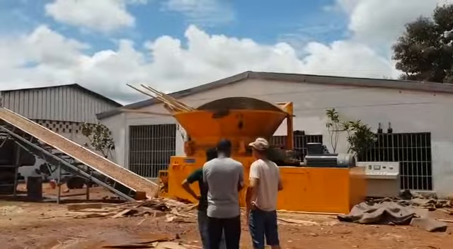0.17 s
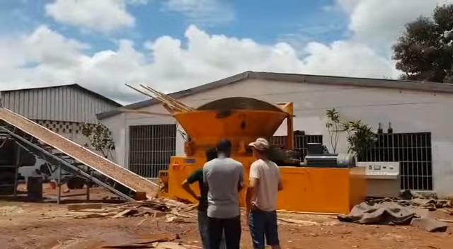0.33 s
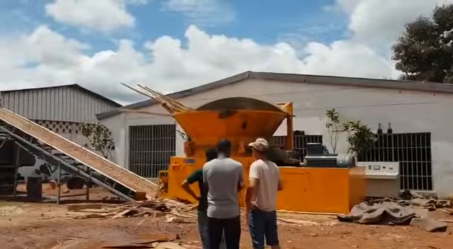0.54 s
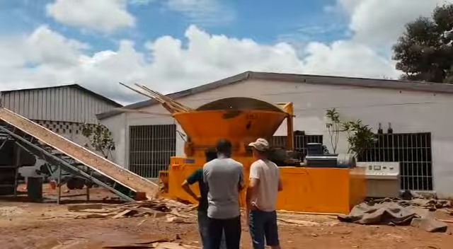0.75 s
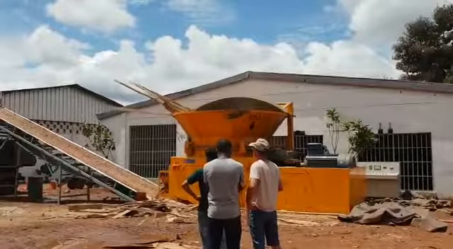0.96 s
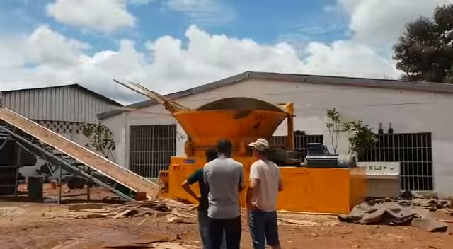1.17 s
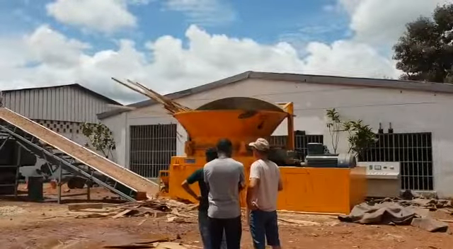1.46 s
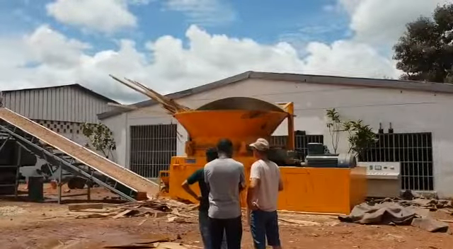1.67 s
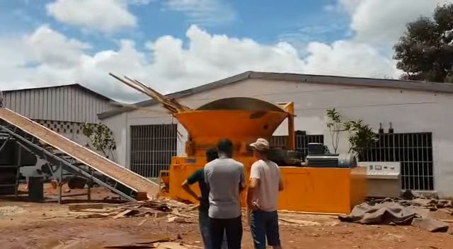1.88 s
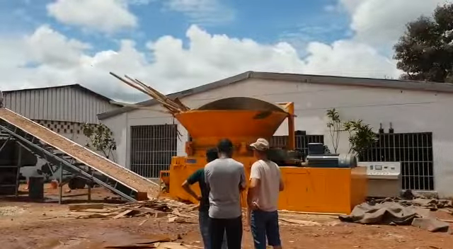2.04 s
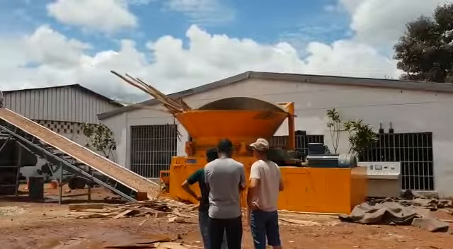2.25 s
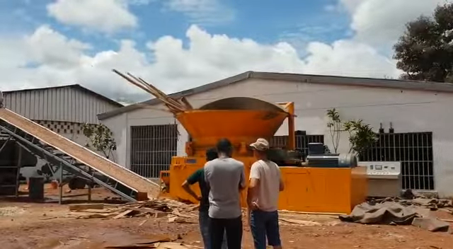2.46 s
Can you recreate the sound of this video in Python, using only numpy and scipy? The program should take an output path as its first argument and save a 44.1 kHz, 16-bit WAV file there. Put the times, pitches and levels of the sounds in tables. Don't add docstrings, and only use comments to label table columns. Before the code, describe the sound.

A large wood shredder drones and grinds outdoors, chips rattling. Knocks build to a loud ringing crack, then it eases to a steadier hum before low thuds return; small camera microphone at some distance, with echoes off buildings.

```python
import sys
import numpy as np
from scipy import signal
from scipy.fft import rfft, irfft, next_fast_len
from scipy.io import wavfile
from scipy.ndimage import uniform_filter1d, minimum_filter1d

SR = 44100
rng = np.random.default_rng(int(sys.argv[2]) if len(sys.argv) > 2 else 0)


def amp(db):
    return 10 ** (np.asarray(db, float) / 20)


def write(x):
    x = np.atleast_2d(x).T
    wavfile.write(sys.argv[1], SR, np.round(np.clip(x, -1, 1) * 32767).astype(np.int16))


N = 115101
RISE_S = .0007
CRACK_HZ = 2050


def evened(x):
    return x / np.sqrt(np.mean(x ** 2) + 1e-20)


def smooth(x, size):
    return uniform_filter1d(uniform_filter1d(x, size), size)


def read(points, hz):
    f, value = np.transpose(points)
    return np.interp(np.log(hz + 1), np.log(f + 1), value)


def colour(x, gain):
    size = next_fast_len(x.shape[-1] + 2048)
    spectrum = rfft(x, size) * gain(np.fft.rfftfreq(size, 1 / SR))
    return irfft(spectrum, size)[..., :x.shape[-1]]


def resonate(x, hz, width_hz):
    turn = np.exp(2j * np.pi * hz * np.arange(x.shape[-1]) / SR)
    r = np.exp(-np.pi * width_hz / SR)
    return 2 * (turn * signal.lfilter([1 - r], [1, -r], x / turn)).real


# start_s, hammer_load_db, wood_feed_db, frame_hum_db
WORK = [(0, -21, -22, -22.5), (0.202, -25, -22.5, -23.5), (0.401, -23.5, -21, -21.5),
        (0.549, -26, -17, -21.5), (0.612, -23.5, -17, -23.5), (.648, -26.5, -20, -22),
        (.668, -26, -18, -23), (0.802, -31.5, -20, -23.5), (.95, -23.5, -25, -23),
        (1.151, -25.5, -28.5, -24.5), (1.35, -25, -31, -24.5), (1.6, -21.5, -31, -24),
        (1.848, -22.5, -29, -23.5), (2.05, -19.5, -26, -22.5), (2.199, -17.5, -24.5, -22),
        (2.401, -13.5, -22.5, -22.5), (2.61, -16.5, -24.5, -21.5)]
LOAD, FEED, HUM = 1, 2, 3


def control(column):
    rows = np.array(WORK)
    v = np.interp(np.arange(N) / SR, rows[:, 0], rows[:, column])
    return v - v.mean()


# pitch_hz, side_minus_mid_db
APART = [(60, -18), (100, -9.5), (180, -12.5), (300, -15), (520, -13), (890, -2), (1530, 1.5), (2630, 1.5),
         (4520, 1.5), (7760, -16.5)]


def pair(a, b):
    lag_s = .00004
    side = colour(b, lambda hz: amp(read(APART, hz) - 4.5))
    late = lambda s: colour(a, lambda hz: np.exp(-1j * np.pi * hz * s))
    return np.array([late(lag_s) + side, late(-lag_s) - side])


def noise(shape, patchy_db):
    frames, hz = N // 256 + 5, np.fft.rfftfreq(1024, 1 / SR)
    a, b, c, d, patches = rng.standard_normal((frames, 513, 5)).T
    patches = evened(uniform_filter1d(uniform_filter1d(patches, 10, 0), 10, 1))
    level_db = read(shape, hz)[:, None] + patchy_db * patches
    z = np.array([a + 1j * b, c + 1j * d]) * amp(level_db)
    return pair(*evened(signal.istft(z, nperseg=1024, noverlap=768)[1][:, :N]))


def yard(x):
    t60_s = .45
    taps = np.zeros((2, SR // 2))
    at = np.arange(200, SR // 2 - 22, 22) + rng.integers(0, 22, (2, (SR // 2 - 201) // 22))
    np.put_along_axis(taps, at, rng.choice([-1., 1.], at.shape), 1)
    hz, t, z = signal.stft(taps, SR, nperseg=256)
    fade_db = -60 * t / t60_s * (1 + hz / 6000)[:, None]
    tail = signal.istft(z * amp(fade_db), SR, nperseg=256)[1]
    tail = tail / np.linalg.norm(tail[0])
    return pair(*signal.fftconvolve(x[None], tail, axes=1)[:, :N])


# pitch_hz, level_db (per Hz)
RUMBLE = [(12, -47), (20, -13), (43, -4.5), (70, 4), (240, 6), (357, -16.5), (595, -2.5), (767, -24.5),
          (900, -12), (1170, -19.5), (1980, -120)]
# pitch_hz, level_db (per Hz)
GRIND = [(180, -39.5), (300, -9), (373, -8.5), (585, -9.5), (779, -7.5), (1130, -10), (3540, -18),
         (7290, -30), (7800, -23.5), (10100, -84), (17200, -120)]


def machine():
    rumble = amp(-24.5 + 0.27 * control(LOAD)) * noise(RUMBLE, patchy_db=-0.1)
    whirr = amp(-30.5) * noise(GRIND, patchy_db=-2.5)
    grind = amp(-24 + 0.78 * control(FEED)) * noise(GRIND, patchy_db=2.0)
    return rumble + whirr + grind


def chips():
    chips_per_s, level_db, spread_db = 2500, -27.5, 2
    size = amp(spread_db * np.minimum(rng.exponential(1, N), 4))
    hits = size * (rng.random(N) < chips_per_s / SR)
    which = rng.integers(0, 32, N)
    t, out = np.arange(1500) / SR, np.zeros(N)
    for k, hz in enumerate(np.geomspace(500, 7000, 32)):
        ring = np.sin(2 * np.pi * hz * t) * np.exp(-t * hz / 3.0)
        out += signal.oaconvolve(hits * (which == k), amp(read(GRIND, hz)) * hz * ring)[:N]
    return amp(level_db + 1.01 * control(FEED)) * evened(out)


# start_s, level_db
TICKS = [
    (.6553, -8),
    (.972, -18.5),
]


def ticks():
    edge_hz, t60_s = 8210, 0.017
    t, out = np.arange(800) / SR, np.zeros(N)
    for s, db in TICKS:
        out[round(s * SR):][:len(t)] += amp(db - 60 * t / t60_s) * rng.standard_normal(len(t))
    return colour(out, lambda hz: (hz / 5000) / (1 + (hz / edge_hz) ** 70))


# start_s, level_db, pitch_hz, t60_s (time to fall 60 dB)
THUDS = [(.09, -25, 115, .12), (0.528, -19, 105, 0.049), (0.628, -14.5, 116, .12), (.83, -18.5, 539, 0.084),
         (.94, -21.5, 570, 0.072), (1.272, -24, 125, .1), (1.78, -26, 313, 0.19),
         (2.112, -19.5, 160.5, 0.16), (2.226, -15.5, 167, 0.079), (2.329, -15.5, 165, 0.16),
         (2.404, -20.5, 132.4, 0.15), (2.43, -26.5, 252, 0.087), (2.55, -19.5, 138.7, 0.083)]


def thuds():
    rise_s, glide = 0.023, 0.051
    t, out = np.arange(9000) / SR, np.zeros(N + 9000)
    for s, db, hz, t60 in THUDS:
        rise = np.sin(np.pi / 2 * np.minimum(t / rise_s, 1)) ** 2
        fall = amp(db - 60 * np.maximum(t - rise_s, 0) / t60)
        boom = np.sin(2 * np.pi * hz * t * (1 + glide * t / 0.039))
        out[round(s * SR):][:len(t)] += rise * fall * boom
    return out[:N]


# pitch_hz, width_hz, level_db
TUB = [(1064, 64, -4.5), (1840, 68, -0.5), (2182, 35, 3.5), (2632, 26, 1), (2853, 360, -4),
       (3180, 110, -3.5), (3510, 50, -0.5), (4170, 35, 3.5), (4430, 53, -9.5)]
# start_s, level_db, t60_s (time to fall 60 dB)
CLANGS = [
    (.6566, -14, .16),
    (.6760, -19, .12),
]


def clangs():
    t, out = np.arange(9000) / SR, np.zeros(N)
    for s, db, t60 in CLANGS:
        for hz, _, mode_db in TUB:
            mode = np.sin(2 * np.pi * hz * t + rng.uniform(0, 2 * np.pi))
            twin = 0.44 * np.sin(2 * np.pi * hz * rng.uniform(0.97, 1.04) * t)
            fade = amp(db + mode_db - 60 * t / t60 * (hz / CRACK_HZ) ** .5)
            out[round(s * SR):][:len(t)] += fade * np.minimum(t / RISE_S, 1) * (mode + twin)
    return out


# start_s, level_db, t60_s (time to fall 60 dB), brightness_db (per octave), wall_ring_db
KNOCKS = [(0.015, -18, 0.11, -5.5, -9), (.144, -13, 0.24, -9, -6), (.308, -21.5, 0.13, -12.5, -4),
          (.514, -25.5, .08, 0, 2.5), (.527, -10.5, 0.072, -10.5, -1.5), (.591, -9.5, 0.29, 2.5, -9.5),
          (.602, -9, 0.21, 5, -2.5), (0.6567, -0.5, 0.17, -1.5, -1.5), (0.675, -12, 0.1, 2, 4.5),
          (0.6988, -10.5, 0.12, -4, 0), (0.753, -13.5, 0.074, -6, 1), (.959, -14.5, 0.34, 0.5, -13),
          (1.472, -24.5, 0.1, 13.5, -5), (1.690, -18, 0.1, -4, -6), (2.068, -27.5, .07, 2, -3.5),
          (2.1, -19, 0.093, 0, -8), (2.3, -19, .08, 3, -9), (2.413, -16, 0.085, -2, -5),
          (2.52, -19, 0.099, -10.5, -13)]


def knocks():
    t, out = np.arange(12000) / SR, np.zeros(N + 12000)
    for s, db, t60, tilt_db, ring_db in KNOCKS:
        rise_s = np.clip(RISE_S * amp(-3.5 * ring_db), RISE_S, .012)
        burst = rng.standard_normal(len(t)) * amp(-60 * t / t60) * np.minimum(t / rise_s, 1)
        strike = 0.33 * burst + 25 * (t == 0)
        ring = sum(amp(d + 10 + ring_db) * resonate(strike, hz, w) for hz, w, d in TUB)

        def tone(hz):
            tilt = tilt_db * np.log2((hz + 50) / 1500)
            arch = -2.5 * np.log2((hz + 50) / CRACK_HZ) ** 2
            return amp(read(GRIND, hz) + tilt + arch) * (hz > 350)

        both = colour(burst + ring, tone)
        out[round(s * SR):][:len(t)] += amp(db - 8.5) * both / np.sqrt(np.mean(both[:1000] ** 2))
    return out[:N]


# shaft_multiple, level_db
BEAT = [(1, -14.5), (2, 4.5), (3, -6), (4, -5.5), (5, -3.5), (6, -7), (7, -4.5), (8, -5), (9, -4.5),
        (10, -16), (11, -29.5), (12, -14), (13, -21), (14, -14), (15, -12), (16, -26), (17, -20),
        (18, -8.5), (19, -49.5), (20, -14.5)]


def rotor():
    rotor_hz, level_db, waver_size = 33.41, -25, 0.16
    first_blow_s, spread_s = .016, 0.003013
    second_turn, second_share = .44, 0.77
    t, out = np.arange(N) / SR, np.zeros((2, N))
    load, hum = control(LOAD), control(HUM)
    for k, db in BEAT:
        a, b = (evened(smooth(v, 3000)) for v in rng.standard_normal((2, N)))
        drift = a + 1j * b
        waver = waver_size * np.sqrt(k / 2) * drift / 2
        rows = 1 + second_share * np.exp(-2j * np.pi * k * second_turn)
        since = t - first_blow_s - spread_s * k / 10
        spin = rows / abs(rows) * np.exp(2j * np.pi * k * rotor_hz * since)
        line = np.array([1 + waver, drift]) * spin
        swell_db = 2.6 * hum if k < 4 else 0.94 * load * (5 / k) ** 0.74
        out += amp(db + swell_db) * line.real
    return amp(level_db) * pair(*out)


def thin(x):
    hz, _, z = signal.stft(x, SR, nperseg=1024, noverlap=768)
    mid, side = z.mean(0), (z[0] - z[1]) / 2
    blur = lambda v, count, size: uniform_filter1d(uniform_filter1d(v, count, 0), size, 1)
    power = abs(mid) ** 2 + 1e-20
    patch = blur(power, 4, 4) + 1e-20
    around = blur(power, 25, 13) + 1e-20
    weak = (10 * np.log10(abs(patch / around)) < -4.2) & (hz > 900)[:, None]
    apart = blur(abs(side) ** 2, 3, 5) / (blur(power, 5, 5) + 1e-20)
    faint = (apart < amp(2 * -17)) & (hz < 1100)[:, None]
    side = side * amp(-25 * faint)
    both = np.array([mid + side, mid - side]) * amp(-11 * weak)
    return signal.istft(both, SR, nperseg=1024, noverlap=768)[1][:, :N]


# pitch_hz, width_hz, level_db
GAPS = [(803, 39, -8.5), (1390, 320, -3), (2465, 240, -4)]


def scene():
    wood = knocks() + chips()
    near = np.hanning(90) * np.sin(np.pi * np.arange(90) ** 2 / 180)
    near = evened(near) / np.sqrt(90)
    close = lambda v: pair(v, signal.oaconvolve(v, near)[:N])
    body = close(wood + thuds()) + amp(-4) * yard(wood) + machine() + rotor()

    def path(hz):
        gaps = amp(sum(db / (1 + ((hz - f) / w) ** 2) for f, w, db in GAPS))
        return gaps * (hz > 12) / (1 + (hz / 7524) ** 100)

    return colour(body, path) + close(ticks() + clangs())


def low_pass(x):
    return signal.sosfilt(signal.butter(12, 15700, fs=SR, output="sos"), x)


def record(dry):
    over = np.minimum(1.04 / (abs(dry).max(0) + 1e-9), 1)
    gain = uniform_filter1d(minimum_filter1d(over, 600), 250)
    mix = np.clip(thin(dry * gain), -.97, .97)
    return low_pass(mix)


dry = scene()
out = record(dry)
write(out)
```